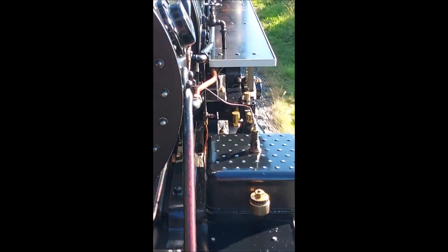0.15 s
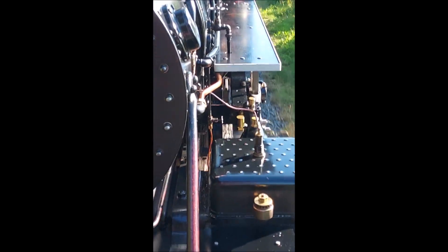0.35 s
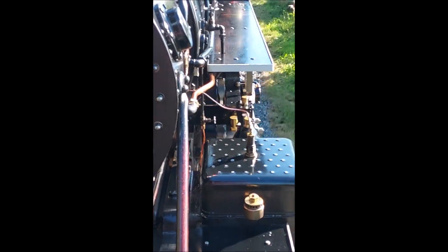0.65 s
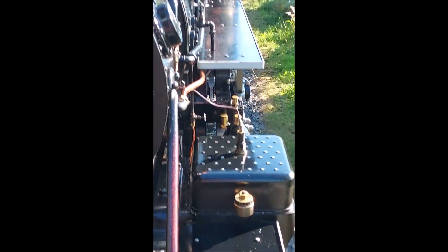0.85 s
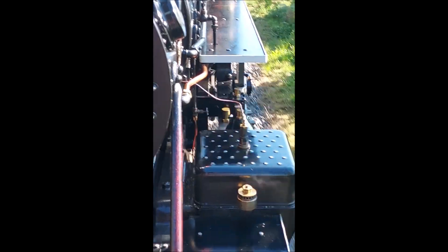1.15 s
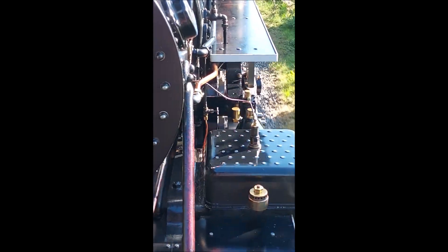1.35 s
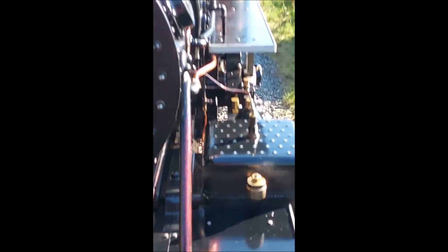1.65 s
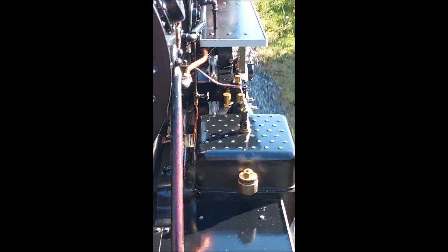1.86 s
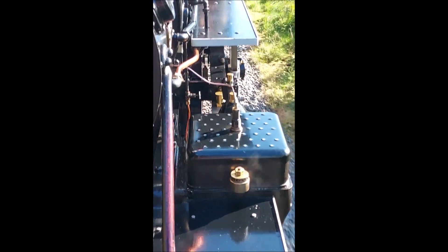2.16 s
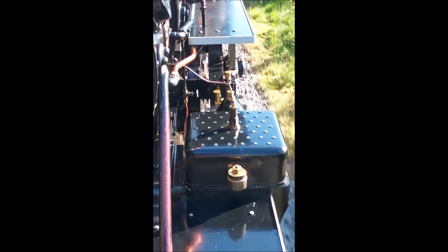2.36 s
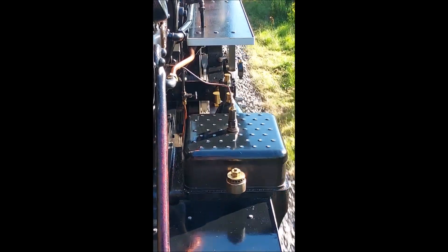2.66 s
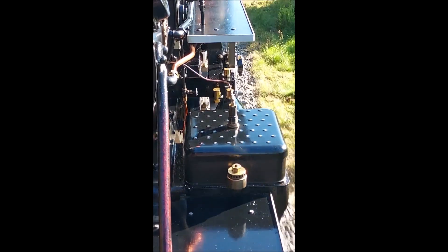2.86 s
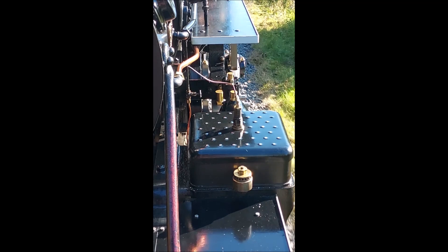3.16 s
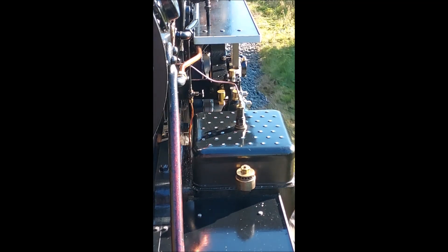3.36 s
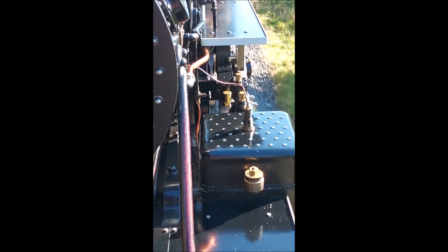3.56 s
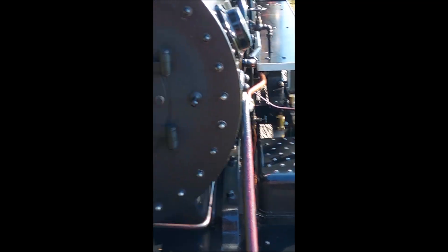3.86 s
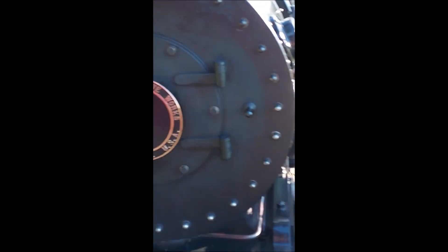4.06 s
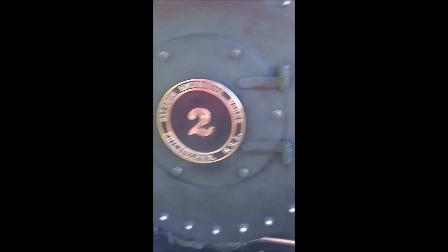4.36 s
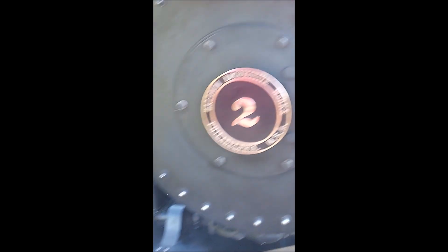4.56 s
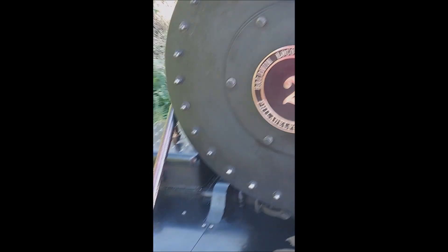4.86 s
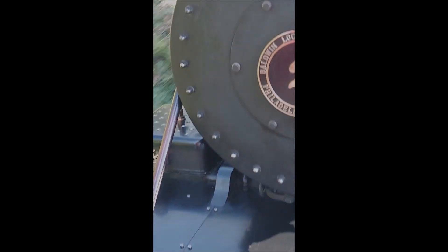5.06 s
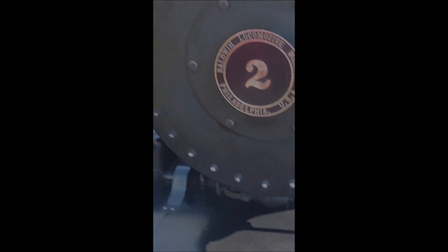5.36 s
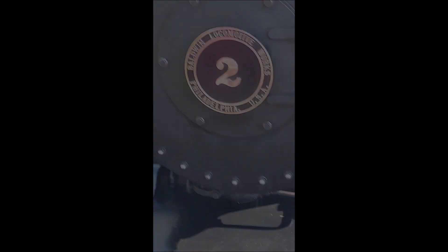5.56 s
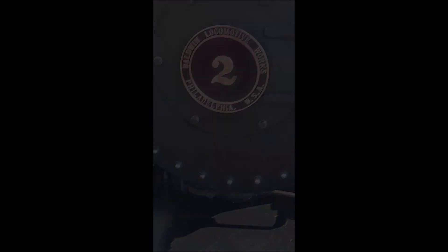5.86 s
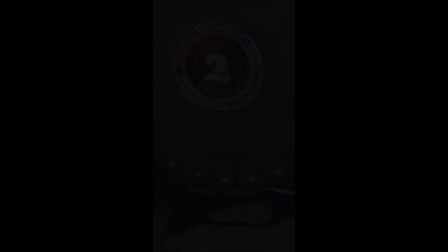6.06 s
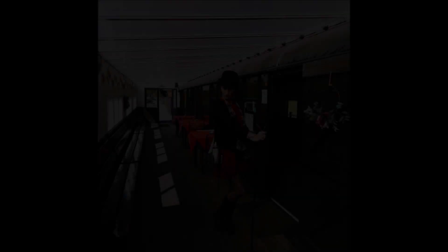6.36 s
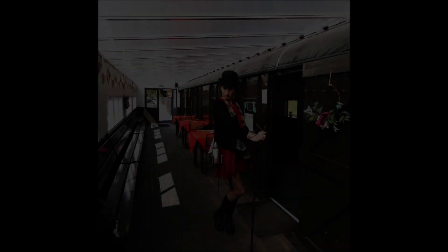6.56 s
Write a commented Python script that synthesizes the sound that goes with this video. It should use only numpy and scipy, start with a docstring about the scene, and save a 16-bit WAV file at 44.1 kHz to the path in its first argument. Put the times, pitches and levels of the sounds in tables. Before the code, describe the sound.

Right channel only, the left silent: the front deck of a small steam locomotive rolling on jointed track, close and dry, outdoors, with little deep bass. A rough wheel rumble, hollow mid-low frame drone, dense loose-plate clatter, spitting steam hiss and faint thin high tones run throughout. Uneven jolts knock at 0.4, 0.55 and 0.7 s; the hardest, a bright crack with short clangs and a faint rail-end ring, lands around 0.84. More clanks follow at 1.03, 1.2 and 1.5, the 1.2 one a looser jangle. It eases around 1.7-2.4, then a crisp clank with a high metallic sing comes at 2.75, and smaller ones at 3.2, 3.4 and 3.6. From 4 s the level sinks, with weak knocks near 4.0, 4.46, 4.65 and 4.9 and a duller hiss. Faint ticks remain after 5.3; it stops at about 6.06, then silence.

```python
"""A small steam locomotive rolls along jointed track, heard from its front deck on the right side only.
Wheels rumble, the frame drones and loose plates clatter: irregular knocks ring groups of resonances.
Single blows ring out, loose parts throb on their own notes, and rail ends sing as wheels meet them.
Steam hisses as filtered noise and thin random tones colour the treble; rail joints jolt wheels, frame,
plates and hiss. The sound fades away and stops."""
import sys
import numpy as np
from scipy import signal
from scipy.io import wavfile
from scipy.ndimage import uniform_filter1d, map_coordinates

SR = 44100
rng = np.random.default_rng(int(sys.argv[2]) if len(sys.argv) > 2 else 0)


def generate_wav(sig):
    """Save sig (samples, or channels by samples) to the path in sys.argv[1] as 16-bit PCM at SR."""
    pcm = np.round(np.clip(np.atleast_2d(sig).T, -1, 1) * 32767).astype(np.int16)
    wavfile.write(sys.argv[1], SR, pcm)


def undo_db(level):
    """Turn decibels back into plain size, where 20 dB means ten times bigger."""
    steps = np.asarray(level, float) / 20
    return 10 ** steps


N = 295470

# Loudness of the steady running, fading out. Each row: time in seconds, relative level in dB.
RUNNING = [(0.0, -26), (0.32, -29), (0.87, -28), (1.31, -31.5), (1.73, -27.5), (1.97, -32.5), (2.28, -32),
           (2.47, -31), (3.05, -33), (3.46, -33.5), (3.68, -34.5), (4.46, -37), (4.7, -40.5), (5.12, -43),
           (5.8, -49), (6.05, -54)]
# Resonances of the frame. Each row: frequency in Hz, width in Hz, relative level in dB.
FRAME_MODES = [(198, 84, -19), (258.7, 68, -10), (307.3, 66, 0), (419, 93, 1.5), (530, 110, -6.5),
               (617, 78, 0.5), (768, 142, -2.5), (969, 126, -4.5), (1109, 145, -6)]
# Resonances of the loose plates. Each row: frequency in Hz, width in Hz, relative level in dB.
PLATE_MODES = [(1336, 394, -3), (1695, 303, 0.5), (2042, 390, -0.5), (2337, 530, -2), (2557, 220, -6.5),
               (2874, 540, -6)]


def evened(x):
    """Scales a signal to an rms of 1."""
    return x / np.sqrt(np.mean(x ** 2) + 1e-20)


def wander(per_s):
    """A smooth random curve of rms near 1, through per_s random points a second."""
    points = rng.standard_normal(1000)
    coarse = np.arange(0, N + 64, 64)
    smooth = map_coordinates(points, [coarse * per_s / SR], order=3)
    return np.interp(np.arange(N), coarse, smooth)


def resonate(x, hz, width):
    """A two-pole resonance applied twice, so that its skirts fall steeply."""
    radius = np.exp(-np.pi * 1.5 * width / SR)
    poles = [1, -2 * radius * np.cos(2 * np.pi * hz / SR), radius * radius]
    once = signal.lfilter([1, 0, -1], poles, x)
    return signal.lfilter([1], poles, once)


def knocking(per_s, spread_db, rub):
    """Small irregular impacts of uneven size over steady rubbing."""
    size = undo_db(spread_db * np.minimum(rng.exponential(1, N), 4))
    hits = size * (rng.random(N) < per_s / SR)
    return evened(hits * rng.standard_normal(N)) + rub * rng.standard_normal(N)


def swell(t, middle, length, rise=0.58, fall=0.75):
    """A bump in time: it sets in abruptly, holds, and dies more gently."""
    before = ((t - middle) / (length * rise)) ** 4
    after = ((t - middle) / (length * fall)) ** 2
    return np.exp(-np.where(t < middle, before, after))


def shaking(part):
    """Steady and jolted strength of part 0 wheels, 1 frame, 2 plates or 3 steam.

    All but the wheels dip briefly in level just before each jolt; the steam dips less."""
    # Rail-joint jolts. Each row: middle in seconds, length in seconds, strength in dB, sharpness in dB.
    jolts = [(0.374, 0.089, -31, -3.5), (0.409, 0.035, -36, 1), (0.533, 0.048, -28, -3.5),
             (0.704, 0.084, -29, -3.5), (0.835, 0.04, -31.5, 3), (0.958, 0.025, -32, -1),
             (1.039, 0.026, -28.5, -1.5), (1.046, 0.033, -36.5, 1.5), (1.209, 0.12, -33.5, -2.5),
             (1.494, 0.031, -30, -1), (1.512, 0.037, -31.5, 0), (1.713, 0.09, -33.5, 0.5),
             (1.87, 0.18, -36, 1), (1.97, 0.034, -40, 2.5), (2.257, 0.058, -35, 2.5),
             (2.427, 0.063, -40.5, 5.5), (2.53, 0.098, -43, 1.5), (2.754, 0.022, -38, 0),
             (2.757, 0.041, -36, -2), (2.974, 0.038, -38.5, 0), (3.028, 0.015, -48, 8.5),
             (3.223, 0.027, -33, 1), (3.319, 0.041, -33, -8), (3.404, 0.14, -38, -7),
             (3.624, 0.03, -37, 2.5), (3.667, 0.039, -48, 7.5), (3.96, 0.11, -51, -13),
             (4.123, 0.085, -51, 6), (4.276, 0.027, -51.5, 9.5), (4.3, 0.059, -41, -1.5),
             (4.444, 0.018, -37.5, 1.5), (4.468, 0.022, -37.5, 3.5), (4.576, 0.063, -40, -25),
             (4.657, 0.077, -36.5, -11.5), (4.817, 0.025, -54, 7.5), (4.924, 0.048, -47, -5),
             (5.108, 0.069, -56, 6), (5.135, 0.11, -41.5, -6.5), (5.242, 0.043, -52, 2.5),
             (5.343, 0.033, -49, -5.5), (5.45, 0.04, -58, 4.5), (5.696, 0.073, -51, -2.5),
             (6.021, 0.09, -53, -7)]
    # Dips in the track that only the wheels feel. Each row: middle in seconds, length in seconds,
    # strength in dB.
    thumps = [(0.126, 0.091, -31.5), (0.604, 0.21, -37), (0.818, 0.1, -32.5), (1.866, 0.17, -36.5),
              (2.455, 0.2, -39), (2.69, 0.14, -35.5), (3.32, 0.033, -38), (3.693, 0.23, -38),
              (4.3, 0.19, -43), (4.557, 0.034, -44), (4.716, 0.13, -42), (4.906, 0.049, -45),
              (5.34, 0.054, -48)]
    # One value for each part: level in dB against the running level.
    steady_db = [-9, -1, -7, -11.5]
    # One value for each part: level in dB against the strength of a jolt.
    jolt_db = [-18.5, -0.5, -1, -6.5]
    # One value for each part: share of a jolt's sharpness that it answers with (a plain factor).
    sharp_share = [0.048, 0.037, 0.84, 1.55]
    # One value for each part: how far it follows the running level away from usual (a plain factor).
    follow = [.85, 0.98, 1.056, 1.03]
    usual_db = -30.5

    t = np.arange(N) / SR
    when, running_db = np.transpose(RUNNING)
    moved_db = follow[part] * (np.interp(t, when, running_db) - usual_db)
    steady = undo_db(usual_db + moved_db + steady_db[part])
    power = np.zeros(N)
    lag = 0.12 if part == 3 else 0  # the hiss swells last; in jolt lengths
    dip_share = 0.6 if part == 3 else 1
    events = list(jolts)
    if part == 0:
        # take off the wheels' jolt level, which the loop adds to every event
        events += [(s, length, db - jolt_db[0], 0) for s, length, db in thumps]
    for s, length, db, sharp_db in events:
        near = slice(max(round((s - 0.4) * SR), 0), round((s + 0.4) * SR))
        if part > 0:
            dip = min(0.31 * undo_db(db - np.interp(s, when, running_db)), 0.7)
            steady[near] *= 1 - dip * dip_share * swell(t[near], s - 0.5 * length - 0.012, 0.019)
        strength = undo_db(db + jolt_db[part] + sharp_share[part] * sharp_db)
        power[near] += (strength * swell(t[near], s + lag * length, length)) ** 2
    return steady, np.sqrt(power)


def metal(modes, part, flicker_db, flicker_per_s, together, **impacts):
    """All modes feel the same knocks, each also its own, and come and go as parts touch and part."""
    shared = together * knocking(**impacts)
    body = np.zeros(N)
    for hz, width, db in modes:
        ringing = evened(resonate(shared + knocking(**impacts), hz, width))
        flicker = undo_db(db + flicker_db * wander(flicker_per_s))
        body += flicker * np.sqrt(width) * ringing
    return np.hypot(*shaking(part)) * evened(body)


def wheels():
    """The rumble: knocks and strong rubbing ring a few deep modes."""
    # Resonances of the wheels. Each row: frequency in Hz, width in Hz, relative level in dB.
    wheel_modes = [(71, 41, -2), (105, 30.6, -2), (136.2, 24.2, -0.5)]
    return metal(wheel_modes, part=0, together=0.5, flicker_db=1.0, flicker_per_s=12.0,
                 per_s=490, spread_db=1, rub=1.4)


def frame():
    """The drone: largely shared knocks ring the middle-low modes of the frame."""
    return metal(FRAME_MODES, part=1, together=0.81, flicker_db=2.0, flicker_per_s=15,
                 per_s=600, spread_db=2.5, rub=1.63)


def plates():
    """The clatter: dense knocks ring the wide, quickly dying modes of loose plates."""
    return metal(PLATE_MODES, part=2, together=0.73, flicker_db=1.9, flicker_per_s=18,
                 per_s=1200, spread_db=0.5, rub=1.04)


def knocks():
    """A blow rings the modes of frame and plates around the place it lands, with a click on top."""
    # Single hard blows. Each row: start in seconds, relative peak level in dB,
    # centre of the answering modes in Hz.
    blows = [(0.083, -18.5, 380), (0.097, -23, 380), (0.2, -26, 1130), (0.204, -19.5, 330),
             (0.383, -20.5, 720), (0.414, -13.5, 2300), (0.535, -13.5, 2400), (0.549, -22.5, 380),
             (0.554, -20, 2500), (0.57, -23, 400), (0.615, -24.5, 420), (0.679, -19.5, 400),
             (0.692, -11, 1500), (0.73, -18.5, 2300), (0.825, -19.5, 2600), (0.833, -10, 1500),
             (0.8397, -6.5, 2900), (0.8402, -5, 2400), (0.8455, -10.5, 640), (0.85, -17, 1150),
             (0.856, -18, 620), (0.861, -17, 620), (1.019, -21.5, 1150), (1.023, -16, 650),
             (1.033, -21, 2600), (1.0385, -15, 780), (1.05, -14.5, 1000), (1.165, -24.5, 2000),
             (1.174, -20, 1650), (1.469, -18, 3000), (1.476, -23.5, 500), (1.487, -17, 520),
             (1.501, -15, 650), (1.524, -21.5, 800), (2.253, -21.5, 2200), (2.256, -23.5, 750),
             (2.415, -23, 400), (2.436, -21.5, 420), (2.74, -17.5, 850), (2.7475, -19.5, 330),
             (2.751, -27.5, 650), (2.7565, -14.5, 720), (2.762, -18.5, 720), (2.767, -18.5, 760),
             (3.209, -29, 2600), (3.215, -34, 650), (3.221, -21.5, 750), (3.244, -20.5, 600),
             (3.311, -24.5, 450), (3.323, -26, 800), (3.369, -18, 2500), (3.607, -22.5, 2508),
             (3.994, -20, 905), (4.439, -28, 2300), (4.445, -26, 400), (4.4607, -23.5, 700),
             (4.466, -28.5, 800), (4.473, -24.5, 2300), (4.544, -26, 330), (4.555, -37, 350),
             (4.622, -30, 900), (4.628, -24.5, 850), (4.677, -29, 320), (4.904, -32, 450),
             (4.922, -27, 420), (4.934, -33, 700), (4.987, -26.5, 450), (5.337, -42, 2050)]
    reach_oct, damping, click_db = 0.44, 0.88, -25  # spread in octaves, factor on mode width, base level
    t = np.arange(2000) / SR
    out = np.zeros(N + 2000)
    hz, width, level_db = np.transpose(FRAME_MODES + PLATE_MODES)[:, :, None]
    dying = np.exp(-np.pi * damping * width * t)
    for s, db, centre_hz in blows:
        distance = np.log2(hz / centre_hz) / reach_oct
        share = undo_db(0.5 * level_db) * np.exp(-0.5 * distance ** 2)
        phase = 0.65 * rng.standard_normal(hz.shape)
        ring = (share * dying * np.sin(2 * np.pi * hz * t + phase)).sum(axis=0)
        # higher blows click louder
        click = undo_db(click_db) * centre_hz / 1000 * np.exp(-t / 0.001183) * rng.standard_normal(2000)
        blow = ring / abs(ring).max() + click
        out[round(s * SR):][:2000] += undo_db(db) * blow / abs(blow).max()
    return out[:N]


def rings():
    """One loose part is struck again and again, so its note throbs but does not break off."""
    # Single parts that clang out. Each row: start in seconds, length in seconds, relative level in dB,
    # name of the part.
    clangs = [(0.0, 0.026, -25.5, "b"), (0.078, 0.053, -31.5, "b"), (0.171, 0.034, -30.5, "a"),
              (0.195, 0.028, -31.5, "e"), (0.287, 0.033, -37, "e"), (0.517, 0.049, -32.5, "j+"),
              (0.521, 0.062, -43, "l"), (0.502, 0.048, -29.5, "a"), (0.547, 0.038, -29.5, "a+"),
              (0.686, 0.025, -32, "b"), (0.74, 0.04, -34, "e"), (0.666, 0.031, -34, "i"),
              (0.694, 0.045, -33, "j"), (0.822, 0.016, -26.5, "j"), (0.825, 0.029, -28.5, "g+"),
              (0.843, 0.012, -23, "e"), (0.836, 0.011, -26.5, "l+"), (0.842, 0.012, -26.5, "j"),
              (0.827, 0.014, -23.5, "c"), (0.84, 0.03, -23, "c"), (0.857, 0.022, -28, "a-"),
              (1.018, 0.022, -31, "e+"), (1.02, 0.014, -24.5, "c-"), (1.054, 0.045, -38, "l"),
              (1.03, 0.04, -20.5, "d"), (1.041, 0.055, -34, "a+"), (1.144, 0.065, -34.5, "f"),
              (1.172, 0.024, -27, "f"), (1.189, 0.027, -30, "f-"), (1.208, 0.027, -31, "g"),
              (1.233, 0.021, -32, "g"), (1.253, 0.018, -31.5, "f"), (1.162, 0.03, -39, "h-"),
              (1.248, 0.03, -37, "e"), (1.313, 0.03, -39, "h-"), (1.209, 0.02, -39, "l"),
              (1.255, 0.016, -34.5, "j+"), (1.292, 0.018, -32.5, "j+"), (1.315, 0.06, -41, "j+"),
              (1.34, 0.03, -38, "f-"), (1.368, 0.012, -34, "f-"), (1.468, 0.017, -25, "c-"),
              (1.47, 0.027, -27, "a-"), (1.469, 0.014, -30, "b"), (1.467, 0.013, -35, "m"),
              (1.486, 0.01, -35.5, "l+"), (1.474, 0.02, -44, "q"), (1.481, 0.028, -31, "c"),
              (1.506, 0.025, -30, "c+"), (1.478, 0.016, -46, "p"), (1.493, 0.016, -40, "p"),
              (1.526, 0.063, -33, "c"), (1.541, 0.041, -32.5, "e"), (1.568, 0.012, -36, "c"),
              (1.672, 0.12, -37.5, "g"), (2.279, 0.015, -30, "d"), (2.41, 0.05, -42, "j"),
              (2.573, 0.049, -36, "d"), (2.716, 0.047, -30.5, "axle"), (2.742, 0.011, -28, "a"),
              (2.75, 0.022, -29, "c"), (2.74, 0.021, -30, "d+"), (2.751, 0.021, -24.5, "d+"),
              (2.774, 0.02, -28, "d+"), (3.212, 0.025, -33, "c"), (3.213, 0.016, -35, "d"),
              (3.236, 0.04, -35.5, "d"), (3.375, 0.031, -39, "k"), (3.612, 0.032, -41, "g"),
              (3.939, 0.028, -35, "c"), (3.969, 0.045, -39, "c-"), (3.971, 0.015, -38, "d"),
              (3.995, 0.03, -38, "d"), (3.964, 0.046, -37, "e"), (4.203, 0.025, -36.5, "a"),
              (4.269, 0.022, -36, "a"), (4.458, 0.02, -40, "k"), (4.455, 0.025, -29.5, "d"),
              (4.452, 0.013, -30.5, "c-"), (4.468, 0.026, -37, "a"), (4.534, 0.044, -37.5, "a"),
              (4.644, 0.032, -49, "j"), (4.664, 0.03, -39, "a-"), (4.818, 0.03, -47, "i"),
              (4.906, 0.05, -39.5, "b"), (5.112, 0.03, -52, "n"), (5.112, 0.043, -55, "o"),
              (5.337, 0.013, -45, "h"), (5.35, 0.034, -53, "h-"), (5.413, 0.02, -50, "i"),
              (5.494, 0.029, -53, "h"), (5.529, 0.03, -53, "i"), (5.66, 0.012, -47, "h"),
              (5.68, 0.035, -53, "h-"), (5.668, 0.015, -55, "j+")]
    # Loose parts, from heavy to light. Each entry: name of the part, its note in Hz.
    loose_hz = {"axle": 82, "a-": 269, "a": 363, "a+": 406, "b": 444.5, "c-": 554, "c": 631, "c+": 715, "d":
                761, "d+": 769.5, "e": 1130, "e+": 1275, "f-": 1626, "f": 1667, "g": 1698, "g+": 1780, "h-":
                1995, "h": 2050, "i": 2350, "j": 2550, "j+": 2645, "k": 2790, "l": 2970, "l+": 3070, "m":
                3190, "n": 4440, "o": 5350, "p": 5850, "q": 15020}
    width_hz, widening_hz = 14, 36  # light parts ring wider
    evenness, loss_per_khz = 1.05, 0.24  # and rougher: 0 = broken note, 1 = even note
    t = np.arange(N) / SR
    out = np.zeros(N)
    for s, length, db, part in clangs:
        hz = loose_hz[part]
        near = slice(max(round((s - 0.05) * SR), 0), round((s + 0.32) * SR))
        width = width_hz + widening_hz * min(hz / 1000, 2.4) ** 1.5
        tone = resonate(rng.standard_normal(len(t[near])), hz, width)
        even = np.clip(evenness - loss_per_khz * hz / 1000, 0.45, 0.9)
        tone = evened(tone / np.abs(signal.hilbert(tone)) ** even)
        # low parts take longer to build up
        start = np.clip((t[near] - s) / (0.0026 + 1.4 / hz), 0, 1)
        dying = np.exp(-np.maximum(t[near] - s - 0.72 * length, 0) / 0.007)
        out[near] += undo_db(db) * start * dying * tone
    return out


def pings():
    """The wheel scrapes onto the rail end, which sings roughly with its high modes, never evenly."""
    # High modes of the rail end. Each row: frequency in Hz, relative level in dB.
    rail = [(4480, -2), (5600, -5), (6960, -3), (7860, -9), (10800, -10.5), (11800, -4.5), (12700, -7),
            (13600, -2), (14630, -3.5), (15300, -9.5)]
    # A wheel meets the rail end. Each row: start in seconds, relative level in dB,
    # tilt of the modes below 7000 Hz in dB per octave.
    meetings = [(0.821, -44.5, 0.1), (2.739, -37.5, 0), (3.2, -42, 9)]
    rise_s, hold_s, t60_s = 0.001, 0.008, 0.065  # t60: time to fall by 60 dB
    roughness, snap = 0.68, 1.2  # snap: extra strength of the first touch
    t = np.arange(4000) / SR
    out = np.zeros(N + 4000)
    shape = np.minimum(t / rise_s, 1) * undo_db(-60 * np.maximum(t - hold_s, 0) / t60_s)
    shape *= 1 + snap * np.exp(-t / 0.0026)
    for s, db, tilt_db in meetings:
        slow_noise = uniform_filter1d(rng.standard_normal((len(rail), 4000)), size=90, axis=1)
        scrape = 1 + roughness * evened(slow_noise)
        song = np.zeros(4000)
        for (hz, level_db), rough in zip(rail, scrape):
            strength = undo_db(level_db + tilt_db * np.log2(min(hz / 7000, 1)))
            song += strength * rough * np.sin(2 * np.pi * (hz * t + rng.random()))
        out[round(s * SR):][:4000] += undo_db(db) * shape * evened(song)
    return out[:N]


def steam():
    """Leaking steam, patchy and slightly spitting; the ticks of the jolts fill the same range, but duller."""
    # Colour of the hiss. Each row: frequency in Hz, relative level in dB.
    colour = [(1500, -53.5), (3400, -2.5), (5000, -3.5), (8600, -11), (10500, -7.5), (14000, -3.5),
              (15700, -8), (16000, -60)]
    # The colour changes as the microphone turns. Each row: time in seconds, tilt at the upper edge in dB,
    # tilt at the lower edge in dB.
    sheen = [(0, 0, 0), (0.5, 0.3, -0.5), (1, 0, -0.4), (1.7, -0.3, 0.3), (2.4, -0.5, 0), (3.2, 0, 0),
             (4, -0.2, 0.5), (4.6, -2, 1.5), (5.4, -2, 1), (6, -2, -0.1)]
    # The upper and the lower edge, in Hz.
    sheen_hz = [9500, 5800]
    hz, t, z = signal.stft(knocking(per_s=1700, spread_db=-0.5, rub=4.4), SR, nperseg=256)
    patches = uniform_filter1d(rng.standard_normal(z.T.shape), 12, 0)
    patches = evened(uniform_filter1d(patches, 4, 1).T)
    f, db = np.transpose(colour)
    colour_db = np.interp(np.log(hz + 1), np.log(f), db)[:, None]
    z *= undo_db(colour_db + 1.6 * patches)
    when, *tilts_db = np.transpose(sheen)
    for edge_hz, tilt_db in zip(sheen_hz, tilts_db):
        # a positive tilt lifts what lies above its edge and lowers what lies below
        z *= undo_db(np.interp(t, when, tilt_db) * np.tanh((hz[:, None] - edge_hz) / 1200))
    z /= np.std(signal.istft(z, SR, nperseg=256)[1])
    steady, ticks = (np.interp(t, np.arange(N) / SR, strength) for strength in shaking(3))
    z *= np.hypot(steady, ticks * undo_db(4.0 - 4 * hz / 8000)[:, None])
    hiss = signal.istft(z, SR, nperseg=256)[1][:N]
    return undo_db(0.62 * wander(20)) * hiss


def thin_tones(count=60):
    """Many thin, short, random tones from 1 to 15 kHz follow the running level."""
    starts_per_s, t60_s = 260, 0.11  # t60: time to fall by 60 dB
    level_db, tilt_db = -16, -3.5  # level against the running, tilt per octave
    t = np.arange(4000) / SR
    out = np.zeros(N)
    starts = (rng.random(N) < starts_per_s / SR) * undo_db(2.4 * rng.standard_normal(N))
    which = rng.integers(0, count, N)
    tones_hz = np.geomspace(1000, 15000, count) * rng.uniform(1.0, 1.02, count)
    for k, hz in enumerate(tones_hz):
        fading = undo_db(tilt_db * np.log2(hz / 1000) - 60 * t / t60_s)
        tone = np.minimum(t / 0.0033, 1) * fading * np.sin(2 * np.pi * hz * t)
        out += signal.oaconvolve(starts * (which == k), tone)[:N]
    when, running_db = np.transpose(RUNNING)
    return undo_db(level_db + np.interp(np.arange(N) / SR, when, running_db)) * evened(out)


def scene():
    """All parts together on the right; the left is silent."""
    metalwork = wheels() + frame() + plates() + knocks() + rings() + pings()
    train = 2 * (metalwork + steam() + thin_tones())
    # a small microphone loses the deep bass
    train = signal.lfilter(*signal.butter(2, 55, "highpass", fs=SR), train)
    end_s, fade_s = 6.062, 0.028  # middle and length of the closing fade
    train *= np.clip((end_s - np.arange(N) / SR) / fade_s + 0.5, 0, 1) ** 2
    return np.array([0 * train, train])


def band_limit(x):
    """A steep low-pass at the top of the band."""
    return signal.sosfilt(signal.butter(12, 15830, fs=SR, output="sos"), x)


def record(dry):
    """The hardest peaks overload the input softly."""
    ceiling = 1.1
    mix = ceiling * np.tanh(dry / ceiling)
    return band_limit(mix)


dry = scene()
out = record(dry)
generate_wav(out)
```